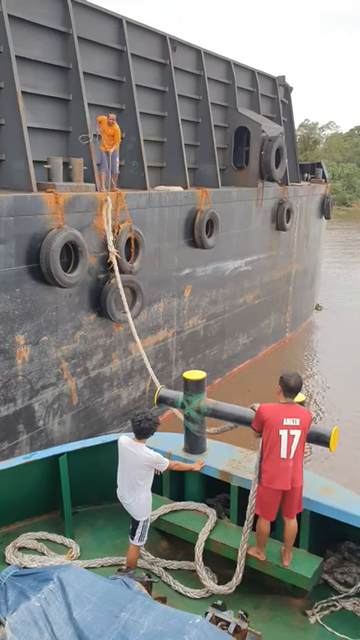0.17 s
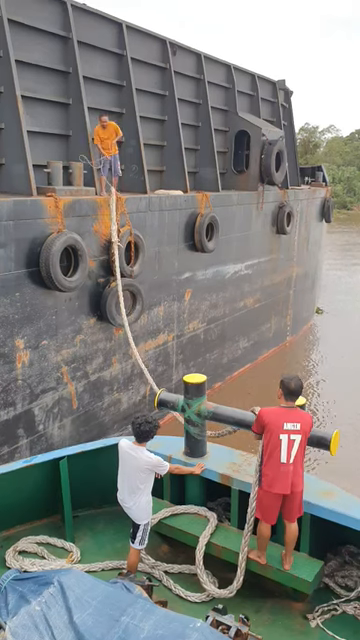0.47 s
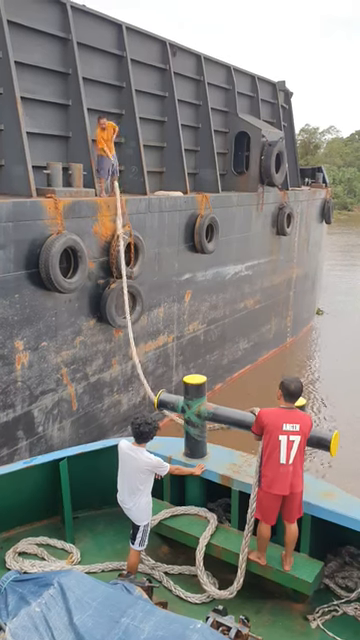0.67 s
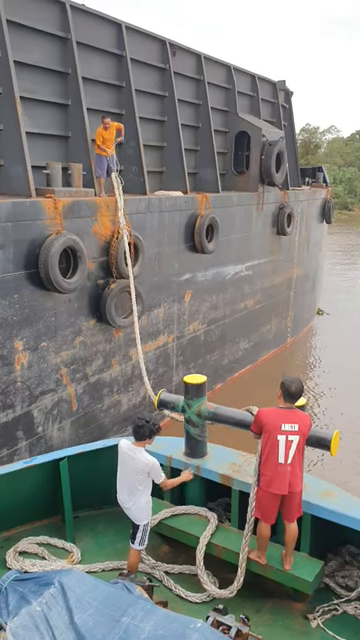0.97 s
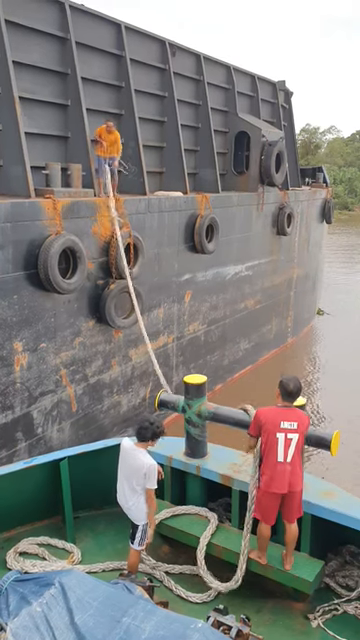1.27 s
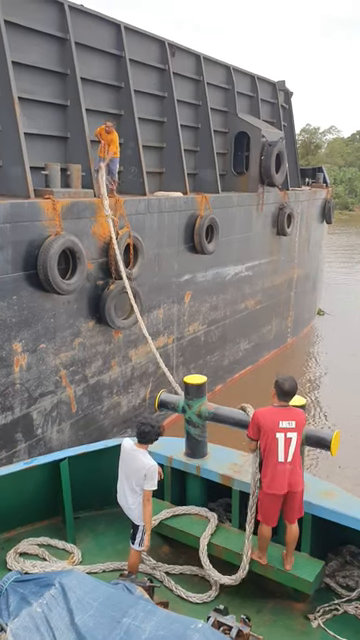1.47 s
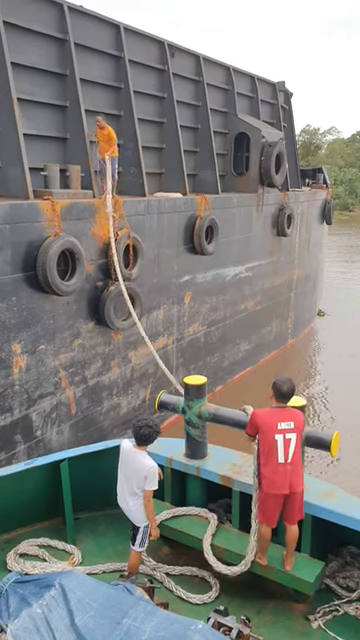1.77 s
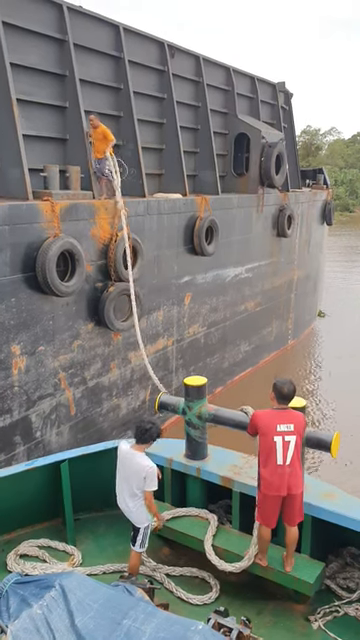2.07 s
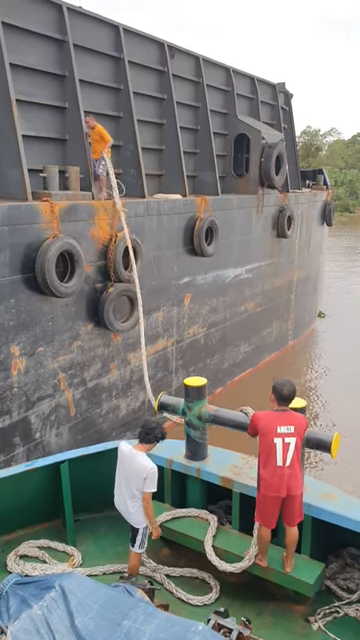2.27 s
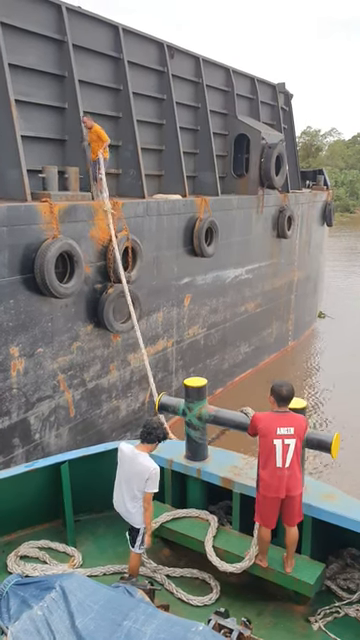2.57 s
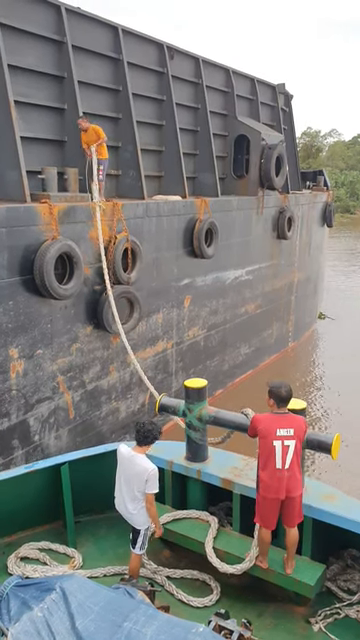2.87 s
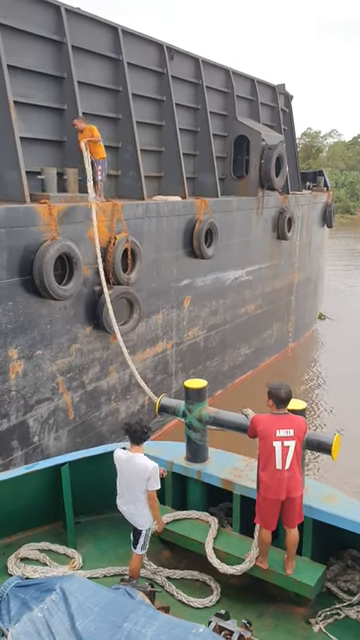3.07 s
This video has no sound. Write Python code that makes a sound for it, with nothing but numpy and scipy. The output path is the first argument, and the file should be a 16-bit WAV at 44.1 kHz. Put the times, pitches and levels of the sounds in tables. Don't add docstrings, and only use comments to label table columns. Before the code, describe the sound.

After a brief silence and a tick, a low engine rumble starts abruptly and holds, swelling and easing, with hum, airy roar and splashing water, captured on a tug deck on a river, microphone exposed to wind.

```python
import sys
import numpy as np
from scipy import signal
from scipy.fft import rfft, irfft, next_fast_len
from scipy.io import wavfile
from scipy.ndimage import uniform_filter1d, map_coordinates

SR = 44100
rng = np.random.default_rng(int(sys.argv[2]) if len(sys.argv) > 2 else 0)


def bounce(signal):
    frames = np.transpose(np.atleast_2d(signal))
    limited = np.clip(frames, -1, 1)
    pcm = np.round(limited * 32767).astype(np.int16)
    wavfile.write(sys.argv[1], SR, pcm)


def to_linear_factor(level_db):
    exponent = np.asarray(level_db, float) / 20
    return 10 ** exponent


N = 141561
T = np.arange(N) / SR

STEADY_HZ = 28.72
GENERATOR_HZ = 12.505

# frequency in Hz, likeness from 0 (unrelated) to 1 (same).
LIKENESS = [(60, .96), (130, .97), (290, .68), (640, .08), (1400, .02)]


def unit(x):
    return x / np.sqrt(np.mean(x ** 2) + 1e-20)


def along(points, hz):
    f, v = np.transpose(points)
    return np.interp(np.log(hz + 1), np.log(f + 1), v)


def over_time(points):
    return np.interp(T, *np.transpose(points))


def wobble(rate):
    knots = rng.standard_normal(int(N * 40 / SR) + 9)
    return map_coordinates(knots, [np.arange(N) * min(rate, 40) / SR])


def filtered(x, response):
    m = next_fast_len(N + 8192)
    return irfft(rfft(x, m) * response(np.fft.rfftfreq(m, 1 / SR)), m)[..., :N]


def rush(spectrum, patchy_db):
    z = signal.stft(rng.standard_normal((2, N)), nperseg=512)[2]
    field = rng.standard_normal(z.shape[1:])
    field = uniform_filter1d(field, size=6, axis=0)
    field = uniform_filter1d(field, size=12, axis=1)
    pair = signal.istft(z * to_linear_factor(patchy_db * unit(field)), nperseg=512)[1][:, :N]

    def shares(hz):
        turn = np.arccos(np.clip(along(LIKENESS, hz), -1, 1)) / 2
        return to_linear_factor(along(spectrum, hz)) * [np.cos(turn), np.sin(turn)]

    mid, side = filtered(pair, shares)
    return unit(np.array([mid + side, mid - side]))


def firings():
    # time in seconds, firings a second.
    hunting_speed = [
        (0, 27.81),
        (.65, 27.84),
        (.95, 27.93),
        (1.3, 28.09),
        (1.55, 28.03),
        (2.15, 27.84),
        (2.5, 27.8),
        (3.2, 27.82),
    ]
    sync_s, lead_turns = 1.0, .073
    hunting = np.cumsum(over_time(hunting_speed)) / SR
    return STEADY_HZ * (T - sync_s) + lead_turns, hunting - hunting[round(sync_s * SR)]


def diesels():
    # multiple of the full engine cycle, steady diesel in dB, hunting diesel in dB.
    exhaust_orders = [(6, -46, -50), (9, -50, -49), (10, -48, -50), (11, -48, -59), (12, -31.3, -26.6),
                      (13, -48, -52), (14, -51, -56), (16, -46, -54), (18, -35, -38), (19, -48, -60),
                      (21, -54, -52), (24, -40, -48), (26, -49, -62), (30, -49, -60), (37, -56, -64),
                      (42, -54, -62), (48, -55, -60), (96, -45.5, -48)]
    # time in seconds, change in dB.
    load_curve = [
        (.1, -3.5),
        (.7, 3),
        (1.35, -1.5),
        (1.9, 2.1),
        (2.7, -3.8),
        (3.2, -0.5),
    ]
    cylinders = 6
    crank_turns = .46
    steady, hunting = firings()
    load_db = over_time(load_curve)
    out = np.zeros(N)
    for k, steady_db, hunting_db in exhaust_orders:
        stray = rng.uniform(0, 2 * np.pi) * (k % cylinders > 0)
        pipe = stray + np.pi * (k > 21)
        for count, db in ((steady, steady_db), (hunting, hunting_db + load_db)):
            drift_db = (.7 + .014 * k) * wobble(2.5 + k / 12)
            out += to_linear_factor(db + drift_db) * np.cos(2 * np.pi * k / cylinders * (count + crank_turns) + pipe)
    return np.sqrt(2) * out


def generator():
    # multiple of the generator's cycle, level in dB.
    strong_tones = [(4, -38), (5, -51), (7, -49), (8, -41), (10, -54), (11, -45), (12, -54), (17, -54),
                    (19, -51), (20, -53), (21, -51), (22, -56), (23, -56), (28, -55), (29, -57), (33, -58),
                    (35, -60), (40, -57), (44, -63), (46, -63), (95, -65), (96, -60), (97, -67),
                    (104, -61.5), (108, -62.5), (132, -68)]
    # frequency in Hz, level in dB.
    fine_comb = [(300, -66), (700, -72), (1200, -72), (1850, -73), (2300, -80), (3000, -84)]
    firing_angle = 1.4
    k = np.arange(2049)
    draw = rng.standard_normal((len(k), 3))
    db = along(fine_comb, k * GENERATOR_HZ) + 2 * draw[:, 0]
    db += 4 * (k % 4 == 0)
    order, order_db = np.transpose(strong_tones)
    db[np.round(order).astype(int)] = order_db
    loose = 1 - np.clip(along(LIKENESS, k * GENERATOR_HZ), 0, 1)
    phase = rng.uniform(0, 2 * np.pi, len(k)) + loose * draw[:, 1:].T
    phase = phase - k / 4 * (phase[0, 4] - firing_angle)
    heard = (k > 3) & (k < 240)
    cycle = irfft(to_linear_factor(db + 2 * loose) * heard * np.exp(1j * phase)) * (len(k) - 1)
    turns = T * GENERATOR_HZ
    sides = [np.interp(turns, np.arange(len(c)) / len(c), c, period=1) for c in cycle]
    return np.sqrt(2) * np.array(sides) * to_linear_factor(1.2 * wobble(4))


def machinery():
    # frequency in Hz, level in dB per Hz.
    rumble_spectrum = [(15, -59), (28, -4), (55, -4), (90, -1.7), (160, -10), (250, -14.5), (400, -28.5),
                       (700, -87)]
    roar_spectrum = [(120, -22), (250, -9), (450, -2.9), (800, -10), (1300, -9.5), (2300, -22.5),
                     (4000, -27), (5500, -43)]
    # time in seconds, change of the rumble in dB.
    gusts = [
        (.11, 8.5),
        (.17, 4.5),
        (.5, 3.5),
        (.7, -1),
        (1.3, -1.5),
        (2.2, -3.5),
        (2.9, 1.5),
        (3.2, -2.5),
    ]
    steady, hunting = firings()
    beat = np.cos(2 * np.pi * steady) + 0.51 * np.cos(2 * np.pi * hunting)
    beat += 0.59 * np.cos(2 * np.pi * 4 * GENERATOR_HZ * T)
    chuff = 1 + .07 * beat
    rumble = unit(to_linear_factor(1.13 * wobble(7.45)) * rush(rumble_spectrum, patchy_db=2.0))
    roar = unit(chuff * rush(roar_spectrum, patchy_db=1.7))
    return to_linear_factor(-30.5 + over_time(gusts)) * rumble + to_linear_factor(-38 + 0.22 * wobble(3.03)) * roar


def water():
    # frequency in Hz, level in dB per Hz.
    hiss_spectrum = [(2000, -5), (3800, -3.5), (5300, 1.4), (7000, -5), (8100, -18), (10200, -19),
                     (12000, -12.5), (15300, -22)]
    splash_spectrum = [(1200, -24), (1900, 4), (2700, -5.3), (3300, -4), (4500, -56)]
    # time in seconds, level in dB.
    swell = [
        (.13, -53.5),
        (.5, -53),
        (1.2, -53.5),
        (2.0, -52.5),
        (2.6, -53.5),
        (3.2, -52),
    ]
    outfall = [
        (.1, -50.5),
        (.5, -50),
        (.9, -52.5),
        (1.4, -57),
        (2.2, -53.5),
        (3.2, -56.5),
    ]
    hiss = to_linear_factor(over_time(swell) + 0.52 * wobble(6.1)) * rush(hiss_spectrum, patchy_db=0.7)
    return hiss + to_linear_factor(over_time(outfall)) * rush(splash_spectrum, patchy_db=1.0)


def rope():
    # start in seconds, level in dB, time to die away in seconds.
    scuffs = [
        (1.69, -59, .015),
        (1.828, -50, .02),
        (2.115, -52, .035),
    ]
    # frequency in Hz, level in dB per Hz.
    scuff_spectrum = [(2500, -25), (4500, -5), (5900, 0), (7500, -8), (14000, -11), (16000, -30)]
    shape = np.zeros(N)
    for start_s, db, length_s in scuffs:
        since = T - start_s
        rise = np.clip(since / 0.0025, 0, 1)
        shape += to_linear_factor(db) * rise * np.exp(-np.clip(since, 0, None) / length_s)
    return shape * rush(scuff_spectrum, patchy_db=2)


def blower():
    phase = 2 * np.pi * np.cumsum(4267 + 1.5 * wobble(6.2)) / SR
    whistle = np.sin(phase) + to_linear_factor(-17) * np.sin(2 * phase)
    return to_linear_factor(-66 + 2 * wobble(5)) * whistle * to_linear_factor([[3], [-3]])


def scene():
    # frequency in Hz, left over right in dB.
    tilt = [(60, -.9), (200, -1), (380, -5.5), (750, -3.5), (2400, 1), (5500, -5.5), (9500, 1.5),
            (14000, -4.5)]
    lag_s = 0.000394
    air = diesels() + generator() + machinery() + water() + rope() + blower()
    side = np.array([[1], [-1]])
    return filtered(air, lambda hz: to_linear_factor(side * along(tilt, hz) / 2) * np.exp(-1j * np.pi * hz * lag_s * side))


def roll_off(x):
    return signal.sosfilt(signal.butter(12, 15730, fs=SR, output="sos"), x)


def record(dry):
    start_s, fade_s = .1158, .003
    tick = to_linear_factor(-33) * (np.arange(N) == round(start_s * SR) + 6)
    kept = filtered(dry, lambda hz: hz < 15170)
    fade = np.clip((T - start_s) / fade_s, 0, 1) ** .5
    return roll_off(kept * fade + tick)


dry = scene()
out = record(dry)
bounce(out)
```